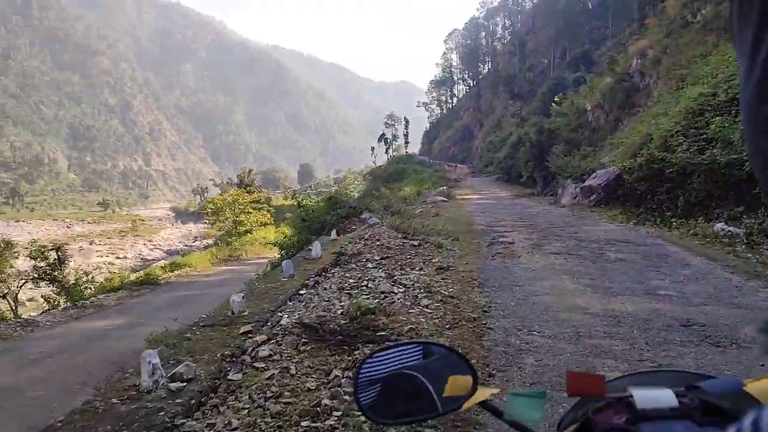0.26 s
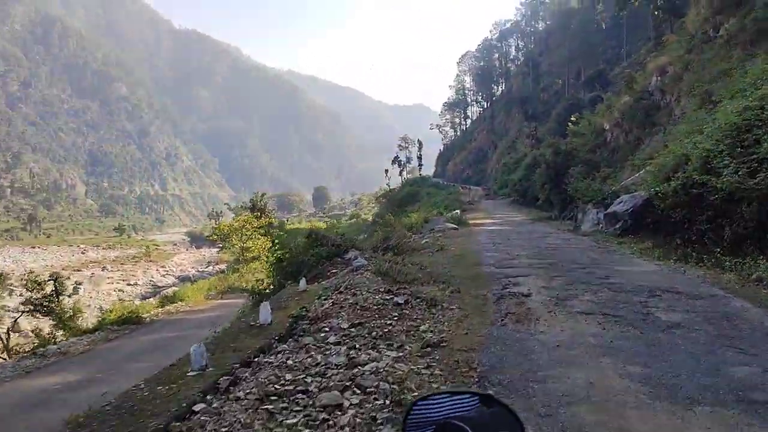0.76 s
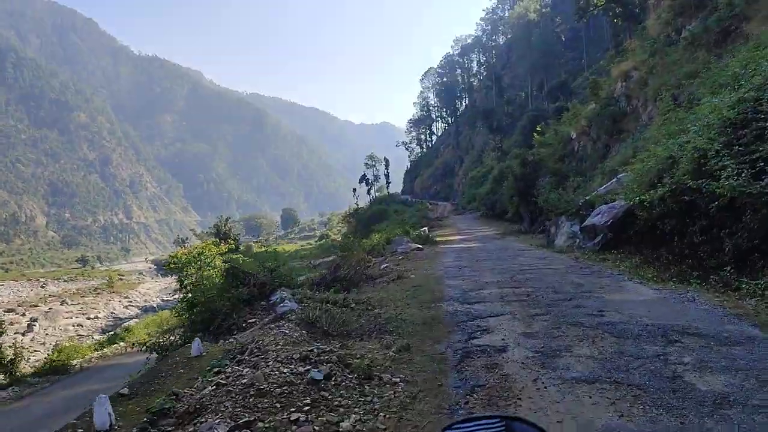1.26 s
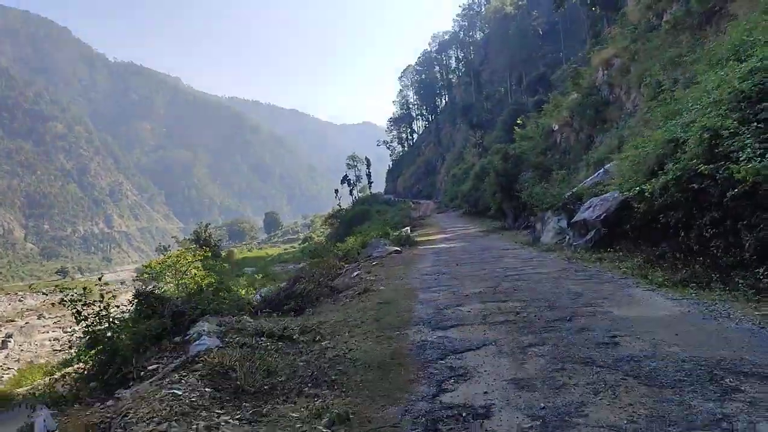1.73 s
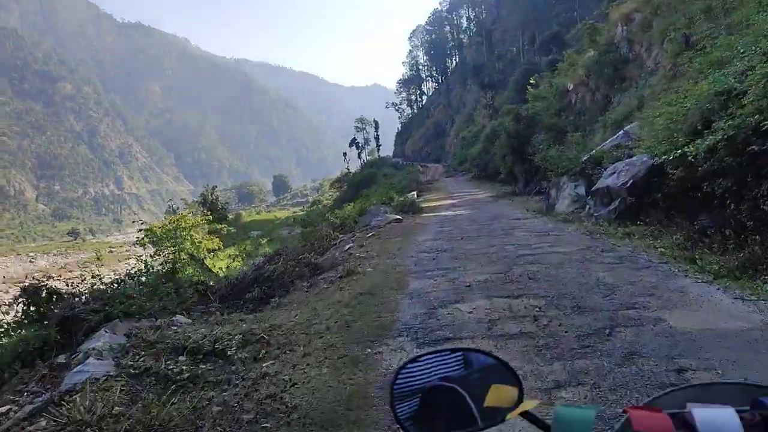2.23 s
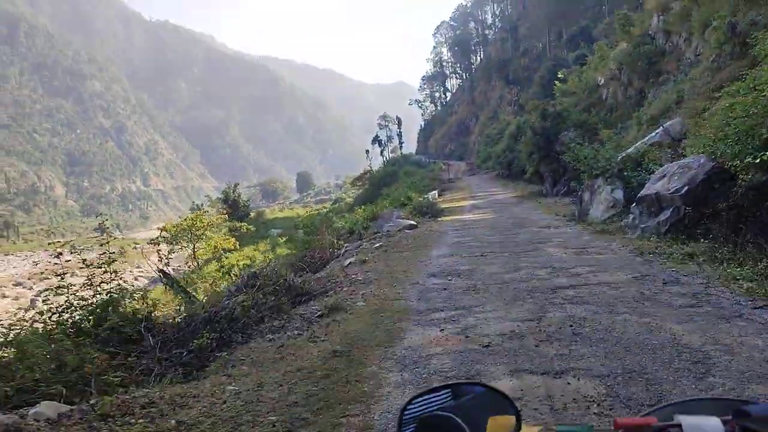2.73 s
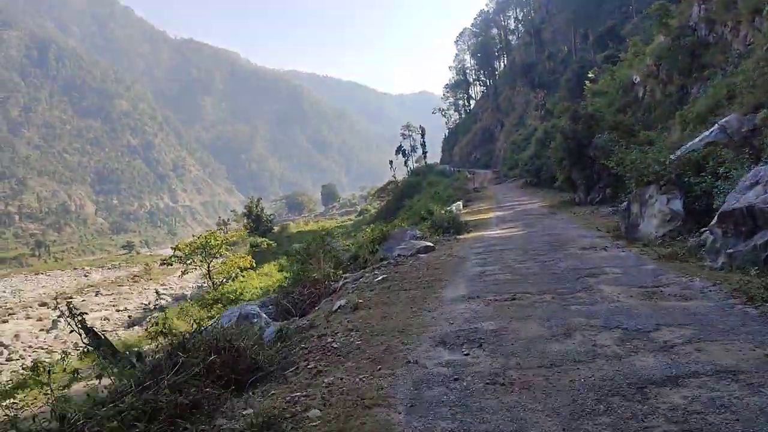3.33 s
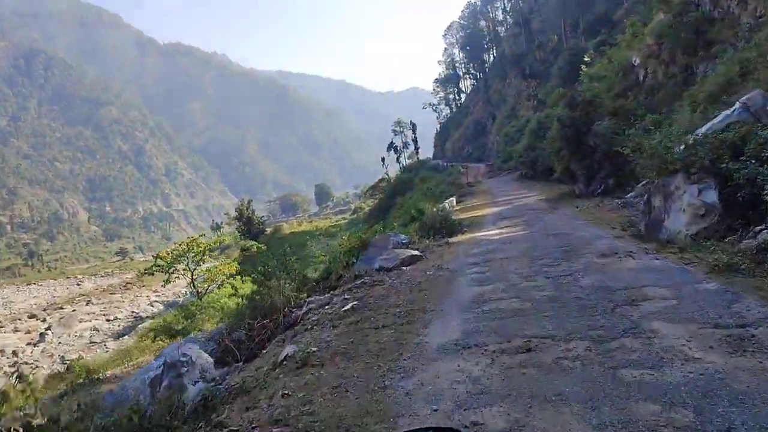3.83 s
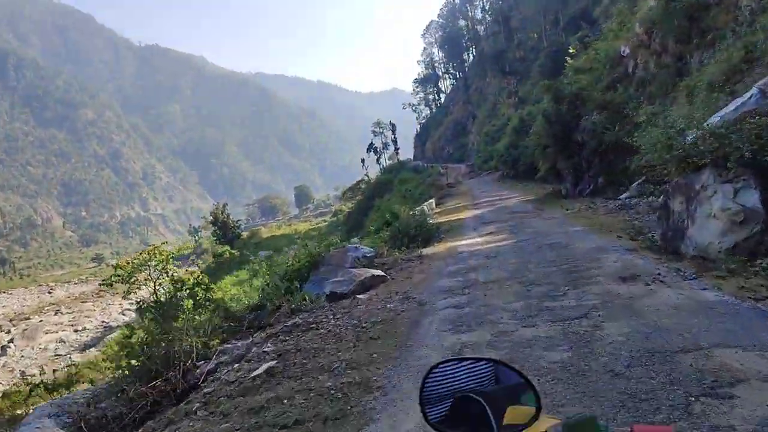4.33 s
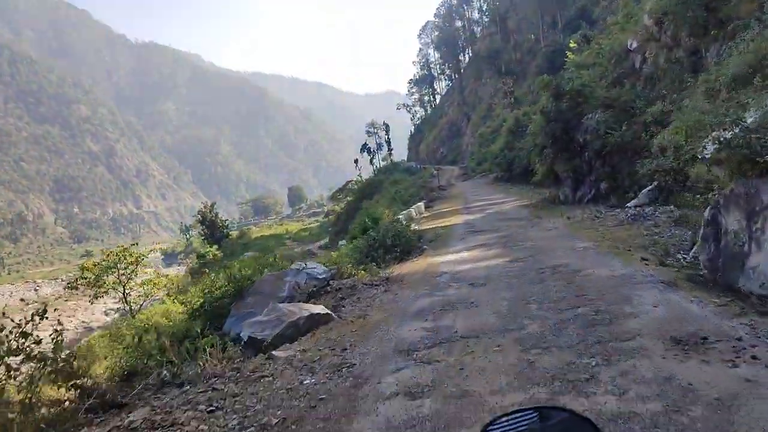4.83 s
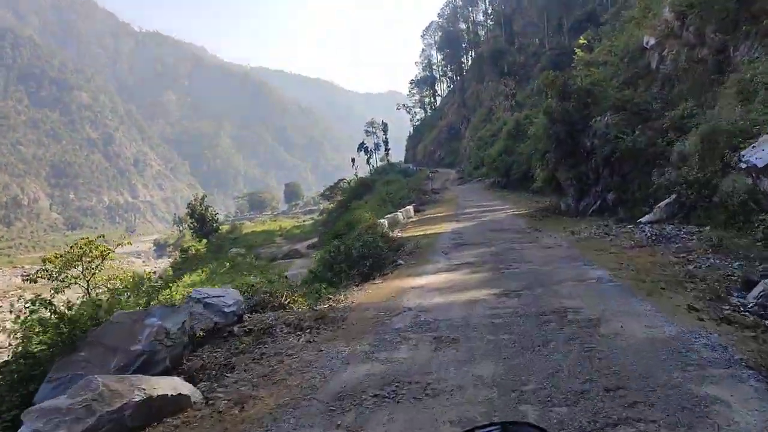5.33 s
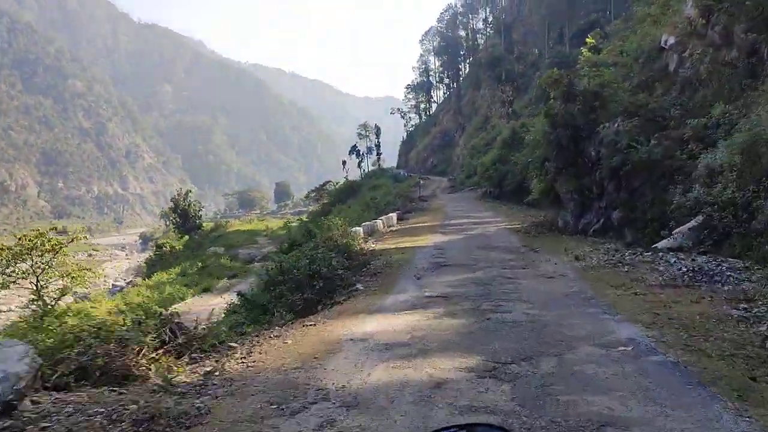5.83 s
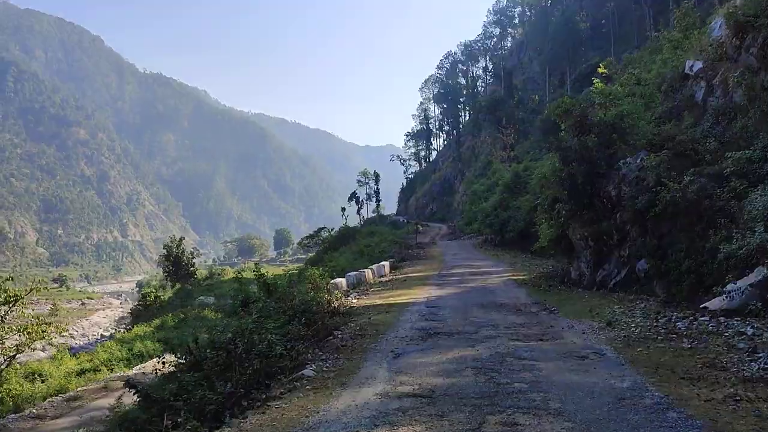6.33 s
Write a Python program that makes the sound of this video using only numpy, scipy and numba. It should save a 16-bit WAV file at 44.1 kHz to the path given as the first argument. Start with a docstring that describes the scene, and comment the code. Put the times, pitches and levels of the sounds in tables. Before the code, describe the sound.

From the saddle, a low thudding motorcycle engine dips, accelerates and dips again under heavy wind gusts, with faint chain whine and loose metal ticks.

```python
"""A single-cylinder motorcycle on a rough hill road, heard from the saddle through two microphone ports.
Timed firings drive its boom, exhaust and clatter; it sinks to idle, picks up, pulls and shuts off again.
Filtered noise makes the wind, with gusts and buffets at each port, brighter towards the end.
Gliding tones make the chain and gears sing; ringing noise makes loose metal tick and rattle over bumps.
A brief squeak is one wavering tone; shaped noise makes the hiss of tyres and air behind it all."""
import sys
import numpy as np
from scipy import signal
from scipy.fft import rfft, irfft, next_fast_len
from scipy.io import wavfile
from scipy.ndimage import uniform_filter1d
from numba import njit

SR = 44100
rng = np.random.default_rng(int(sys.argv[2]) if len(sys.argv) > 2 else 0)


def output_pcm(signal):
    """Save a mono or channel-first signal as 16-bit PCM at the path in sys.argv[1].

    Samples are clipped to [-1, 1] before scaling.
    """
    pcm = np.clip(np.atleast_2d(signal).T, -1, 1) * 32767
    wavfile.write(sys.argv[1], SR, np.round(pcm).astype(np.int16))


N = 290530   # length in samples

# engine speed and throttle: time_s, firings_per_s, throttle (0 shut - 1 open)
ENGINE = [(0.0, 36.6, 0.55), (.28, 35, 0.88), (0.66, 35.8, 0.6), (0.78, 30.8, 0.063), (1.15, 23, 0.074),
          (1.62, 16.9, 0.046), (1.82, 23.3, 0.35), (2.02, 31, 0.85), (2.3, 29.5, 0.65), (2.72, 27.5, 0.8),
          (3.0, 27.6, 0.98), (3.3, 27.6, 0.9), (3.6, 29.5, 0.94), (4.8, 34, 0.99), (5.66, 36.4, 0.58),
          (5.82, 34, .05), (6.15, 26, 0.057), (6.59, 15, 0.054)]
# steady engine orders; the crank turns twice a firing, so the even ones lead:
# multiple (of the firing rate), relative_level_db
ORDERS = [(1, -11), (2, 0), (3, -19), (4, -13.5), (5, -16), (6, -16), (8, -13), (9, -17), (12, -11.5),
          (13, -23), (14, -27), (24, -30), (25, -26), (26, -30), (33, -31), (44, -28), (45, -31)]
# exhaust pipe and silencer resonances: pitch_hz, width_hz, relative_level_db
PIPE = [(72.3, 27, 6.5), (212, 106, -2.5), (290, 77, -2), (412, 33.5, 3.5), (896, 36, -14)]
# crankcase and fin resonances: pitch_hz, width_hz, relative_level_db
CASE = [(800, 174, -1.5), (1177, 146, 0.5), (1534, 95, 1), (2197, 92, -4.5), (3284, 110, -6.5),
        (3960, 67, -5.5)]
# firing and valve knocks in one four-stroke cycle: place (in the cycle, 0-1), relative_level_db
KNOCKS = [(0.05, 1), (0.309, 4), (0.559, 6.5), (0.798, 10.5)]
# whirr of chain and gears: pitch_hz, relative_level_db (per Hz)
WHIRR = [(150, 0), (450, -1), (650, 2.5), (1000, -2), (1500, -3), (1900, -12), (2800, -15), (3800, -22),
         (5200, -22), (8000, -41), (14000, -60)]
# loudness of boom, exhaust and clatter, before side levels and the clatter's own mix:
# level_db (cruising, full throttle), rise_db (per doubling of speed), loss_db (throttle shut)
BOOM_LAW = (-23.8, 17, 14.3)
EXHAUST_LAW = (-27, 0.78, 9)
CLATTER_LAW = (-49.5, 4.1, 4.6)
CRUISE_PER_S = 30   # firings per second
# spread of the firings' strength (dB); turbulent gas against the pulse (0-1)
FIRING_SCATTER_DB, PUFF_SHARE = 1.0, .1

# spells in which the drive chain and gears sing:
# start_s, length_s, start_pitch_hz, end_pitch_hz, level_db (before waver and side level)
WHINE = [(0, 0.78, 856, 879, -50), (2.051, 0.36, 777.4, 769.3, -42.5), (2.407, .21, 795, 831, -45),
         (3.838, 0.3, 699, 713, -44), (5.201, 0.94, 862.4, 904, -41.5)]
WHINE_FADE_S = 0.053

# steady airflow between gusts: time_s, left_db, right_db (before trim), corner_hz (of the eddy spectrum)
AIRFLOW = [(0, -36, -36, 312), (.62, -21, -38.5, 306), (1.28, -26, -44, 426), (1.7, -25, -56, 227),
           (2.45, -28, -45, 350.4), (3.2, -22.5, -32.5, 370), (4.4, -20, -37, 370), (4.95, -22, -34, 680),
           (5.75, -18, -29.5, 740), (6.15, -23, -28, 800), (6.59, -20.5, -38, 800)]
RIGHT_CORNER_SHARE = 0.57   # the steady flow is duller at the right port
# gusts: start_s, length_s, level_db (before trim), corner_hz (of the eddy spectrum), port (0 left, 1 right)
GUSTS = [(0.292, 0.085, -14, 267, 0), (0.487, 0.035, -14, 310, 0), (0.651, 0.046, -7, 298, 0),
         (0.967, 0.13, -17, 415, 0), (0.986, 0.22, -31, 242, 1), (1.39, 0.14, -28, 284.3, 0),
         (1.505, 0.047, -16, 200, 0), (1.58, .15, -17, 162.2, 0), (1.777, 0.08, -15, 197, 0),
         (1.904, 0.087, -21, 231, 0), (2.06, 0.032, -19.5, 247, 0), (2.255, 0.069, -25.5, 304, 0),
         (2.476, 0.13, -30.5, 328, 0), (2.712, 0.078, -14, 279.5, 0), (2.779, 0.13, -21, 424, 0),
         (2.958, 0.063, -16, 390.4, 0), (3.121, 0.078, -30, 325.2, 1), (3.196, 0.06, -16.5, 274.7, 0),
         (3.308, 0.072, -14.5, 376, 0), (3.484, 0.14, -17, 432.6, 0), (3.7, 0.087, -21.5, 330, 1),
         (3.84, 0.16, -17.5, 401, 0), (4.109, 0.11, -15.5, 429.7, 0), (4.18, 0.32, -26, 352.1, 1),
         (4.295, 0.11, -12.5, 305, 0), (4.43, 0.25, -27, 400, 1), (4.48, 0.049, -7, 220, 0),
         (4.591, 0.053, -19, 280, 0), (4.68, 0.059, -12.5, 380.7, 0), (4.798, 0.077, -10, 665, 0),
         (4.924, 0.068, -31, 400, 1), (4.998, 0.07, -11.5, 305.8, 1), (5.099, 0.041, -15.5, 450.6, 1),
         (5.127, 0.022, -16, 498, 0), (5.213, 0.092, -17.5, 230.2, 1), (5.316, 0.2, -16.5, 481, 0),
         (5.366, 0.066, -27, 319, 1), (5.52, 0.039, -22, 290, 1), (5.566, 0.077, -8.5, 445, 0),
         (5.667, 0.028, -15.5, 319, 1), (5.709, 0.12, -14, 543, 0), (5.752, 0.04, -20.5, 260, 1),
         (5.917, 0.048, -17, 720, 0), (5.997, 0.064, -13, 480, 1), (6.066, 0.072, -18, 527, 1),
         (6.193, 0.13, -15.5, 800, 1), (6.322, 0.065, -24.5, 857, 1), (6.406, 0.087, -17, 649, 1),
         (6.529, 0.048, -8.5, 514, 1)]
GUST_ATTACK_S, GUST_RELEASE_S = .02, .03
# shelter at a port, mostly brief lulls: start_s, length_s, change_db, port (0 left, 1 right)
LULLS = [(0.588, 0.06, -17, 0), (1.183, 0.063, -7.5, 0), (2.171, 0.062, -6, 0), (2.35, .12, -3.5, 0),
         (2.92, 0.044, -2.5, 0), (3.635, 0.12, -9.5, 0), (3.782, 0.049, -6, 0), (4.422, 0.059, -8, 0),
         (4.892, .06, -3.5, 0), (5.805, .08, -9, 1), (0.81, .06, 1, 0), (0.936, 0.035, -5, 0),
         (6.472, 0.062, -13, 1)]
LULL_FADE_S = .015
# lumpiness grows with the flow: level_db, share (of full lumpiness, 0-1)
LUMPINESS = [(-26, .5), (-18, 1)]
# eddy shedding: place of its hump and of the skirt above (times the corner); the hump's sharpness (Q)
HUMP_RATIO, SKIRT_RATIO, HUMP_SHARPNESS = .68, 2.7, .8
# single hard buffets: time_s, level_db, corner_hz (of the eddy spectrum), port (0 left, 1 right)
BUFFETS = [(0.308, -14, 300, 0), (0.346, -12, 270, 0), (0.506, -12.5, 380, 0), (0.559, -9.5, 438, 0),
           (0.666, -4.5, 470, 0), (0.693, -4.5, 370, 0), (0.773, -19, 580, 0), (0.793, -7, 430, 0),
           (0.883, -13, 520, 0), (1.043, -12.5, 580, 0), (1.063, -15, 480, 0), (1.521, -11.5, 270, 0),
           (1.617, -7.5, 260, 0), (1.659, -6, 200, 0), (1.707, -5, 180, 0), (1.804, -8.5, 240, 0),
           (2.746, -6.5, 320, 0), (3.326, -9, 435, 0), (3.407, -15.5, 480, 0), (3.576, -12, 630, 0),
           (3.604, -8, 370, 0), (3.72, -10, 600, 1), (3.753, -12, 351, 1), (3.859, -14, 560, 0),
           (4.064, -10.5, 560, 0), (4.119, -11, 600, 0), (4.38, -8.5, 332.7, 0), (4.475, -14.5, 600, 1),
           (4.497, -6, 260, 0), (4.761, -12.5, 720, 0), (4.815, -10.5, 800, 0), (4.859, -11, 482.7, 0),
           (4.886, -13.5, 760, 0), (5.011, -9.5, 477, 1), (5.137, -9, 480, 1), (5.225, -8, 260, 1),
           (5.278, -10, 640, 0), (5.431, -9.5, 690, 0), (5.575, -5, 400, 0), (5.66, -13.5, 705, 0),
           (5.729, -9, 790, 0), (5.756, -10.5, 660, 0), (5.799, -13, 765, 0), (6.098, -8, 720, 0),
           (6.192, -11.5, 780, 1), (6.218, -10.5, 920, 1), (6.305, -16.5, 950, 1), (6.409, -10.5, 760, 1),
           (6.451, -16.5, 760, 1), (6.542, -7, 620, 1)]
# time from push to suction and spread of the blow (periods of the corner); spectrum edge (times the corner)
SWING_TURNS, EDDY_TURNS, BUFFET_EDGE = .8, 2.2, 1.12
# time over which a buffet's level counts (s); its flurry's spread (s) and strength against the pulse (dB)
BUFFET_S, FLURRY_S, FLURRY_DB = .008, .003, -2
# gusts that crack at the right port: time_s, rasp_start_db (before the tone filters)
CRACKS = [(6.194, -28), (6.2195, -12.5), (6.242, -29), (6.248, -27), (6.281, -26), (6.296, -25),
          (6.305, -26), (6.3105, -24), (6.338, -26), (6.359, -31), (6.377, -31), (6.411, -27), (6.44, -29),
          (6.451, -29), (6.5497, -11)]
# a crack's rasp dies quickly (s); its spike stands above it (dB)
CRACK_DECAY_S, SPIKE_DB = .002, 23.5
# the largest eddies, felt as a deep flapping: time_s, level_db (right port then set lower)
FLAP = [(0, -27), (.5, -16), (1.3, -31.5), (2.6, -23.5), (3.66, -18.5), (3.78, -7.5), (3.93, -16),
        (4.55, -13.5), (4.9, -21.5), (5.25, -18.5), (5.9, -18.5), (6.55, -22)]

# loose metal ticking over bumps: time_s, start_db (before ringing and the final level)
TICKS = [(0.4125, -38), (1.6182, -45), (3.2595, -36), (3.4894, -40), (3.5894, -45), (3.689, -34),
         (3.914, -41), (4.2098, -40), (5.4044, -35), (5.6004, -34)]
# resonances of the loose metal: pitch_hz, width_hz, relative_level_db
METAL = [(3820, 130, 4), (5800, 280, -2), (6980, 200, 4), (8040, 680, -1.5), (10100, 900, -12),
         (12600, 900, -12)]
# short rattles on the crankcase: start_s, length_s, level_db
RATTLES = [(2.28, 0.026, -31), (2.43, 0.035, -40), (2.857, 0.069, -45), (3.055, 0.099, -40.5)]
# a brief squeak of the chassis: start_s, length_s, pitch_hz, peak_db
SQUEAK = (.21, .075, 2320, -44)

# hiss of tyres and rushing air: time_s, left_db, right_db (before trim)
HISS = [(0, -50.5, -52.5), (.75, -52.5, -52), (1.55, -58.5, -63.5), (2.35, -51.5, -53), (5.0, -51.5, -50),
        (6.03, -50, -50.5), (6.13, -51, -71), (6.55, -52.5, -69)]
# colour of the hiss: pitch_hz, relative_level_db (per Hz)
HISS_COLOUR = [(1500, 8), (3500, 3.5), (5600, -5), (7000, -1.5), (8300, -3), (9600, -11), (12000, -10.5),
               (14000, -12)]
# brief swishes in the hiss: start_s, length_s, level_db (before trim)
SWISHES = [(0.26, 0.24, -46.5), (5.292, 0.12, -45.5)]
SWISH_ATTACK_S, SWISH_RELEASE_S = 0.15, 0.23

CUTOFF_HZ = 14300   # top of the finished sound


def engine(left_db=-6.5):
    """Engine speed times every pulse; speed and throttle set the loudness; the silencer lies on the right."""
    per_s, throttle = in_time(ENGINE)
    cycles = np.cumsum(per_s * (1 + .002 * drift(10))) / SR
    doublings = np.log2(per_s / CRUISE_PER_S)
    shut = 1 - np.clip(throttle, 0, 1)
    boom_gain, pipe_gain, clatter_gain = [from_db(db + rise_db * doublings - loss_db * shut)
                                          for db, rise_db, loss_db in (BOOM_LAW, EXHAUST_LAW, CLATTER_LAW)]
    bass = boom_gain * boom(cycles)
    pipe = pipe_gain * exhaust(cycles, per_s) * from_db([[left_db], [0]])
    return bass + pipe + clatter_gain * clatter(cycles, per_s)


def boom(cycles, waver_db=2.0):
    """The engine's steady orders are pure tones, each wavering a little in strength."""
    orders = sum(from_db(db + waver_db * drift(10.0)) * np.cos(2 * np.pi * round(multiple) * cycles)
                 for multiple, db in ORDERS)
    return -rms_one(orders)


def exhaust(cycles, per_s, puff_s=0.0038, intake_db=-11, intake_place=0.5):
    """Each firing sends a pulse and a puff of gas down the pipe; the intake gulps half a cycle later."""
    firings = strokes(cycles, 0, FIRING_SCATTER_DB)
    gulps = from_db(intake_db) * strokes(cycles, intake_place, FIRING_SCATTER_DB)
    pulses = (firings + gulps) / np.sqrt(per_s)
    puffs = rng.standard_normal(N) * np.exp(-(cycles % 1) / per_s / puff_s)
    gas = -rms_one(pulses) + PUFF_SHARE * rms_one(puffs)
    return rms_one(cut(resonate(gas, PIPE), 1080, "low"))


def clatter(cycles, per_s, knock_db=5, whirr_db=11.0, throb_db=1.0, knock_s=0.0062):
    """Piston and valves knock on the case; chain and gears whirr in step with the crank."""
    blows = sum(from_db(db) * np.exp(-((cycles - place) % 1) / per_s / knock_s) for place, db in KNOCKS)
    clicks = sum(from_db(db) * strokes(cycles, place, scatter_db=3.0) for place, db in KNOCKS)
    scrape = rms_one(blows * rng.standard_normal((2, N)))
    contact = .3 * scrape + rms_one(clicks)
    knocks = rms_one(cut(resonate(contact, CASE), 2600, "low"))
    # the crank turns twice a cycle
    whirr = coloured_noise(WHIRR) * from_db(throb_db * np.cos(4 * np.pi * cycles))
    return from_db(knock_db) * knocks + from_db(whirr_db) * whirr


def whine(upper_ratio=1.54, upper_db=0, right_db=-3, waver_db=3.5):
    """Two meshes of the drive sing in spells: a clear gliding tone and a rougher one above it."""
    t = np.arange(N) / SR
    out = 0
    for start, length, start_hz, end_hz, db in WHINE:
        glide_hz = np.interp(t, [start, start + length], [start_hz, end_hz])
        hz = glide_hz * (1 + .009 * drift(14))
        clear = np.sqrt(2) * np.sin(2 * np.pi * np.cumsum(hz) / SR)
        rough = from_db(upper_db) * narrow_tone(hz * upper_ratio, width_hz=250)
        out = out + from_db(db) * swell(start, length, WHINE_FADE_S, WHINE_FADE_S) * (clear + rough)
    return out * from_db(waver_db * drift(36.0)) * from_db([[0], [right_db]])


def wind(port, trim_db, lumpy_db, eddy_rate, port_hz, low_hz):
    """Turbulent pressure at one port, with a hump where eddies are shed and a steep fall above it."""
    level_db, corner_hz = flow(port)
    lumps = np.clip(drift(eddy_rate), -2, 1.9)
    # weak flow is smooth, strong flow lumpy, at about equal power
    spread_db = lumpy_db * np.interp(level_db, *np.transpose(LUMPINESS))
    power_fix_db = spread_db ** 2 * np.log(10) / 20
    eddies = rng.standard_normal(N) * from_db(spread_db * lumps - power_fix_db)
    thumps, blowing = buffets(port)
    # the flow slackens around a big eddy
    slack_db = -5.5 * np.minimum(uniform_filter1d(blowing, SR // 25) / .2, 1)
    # large slow eddies carry more pressure
    heavy_db = 4 * (330 / np.maximum(corner_hz, 140) - 1)
    pressure = from_db(level_db + trim_db + slack_db + heavy_db) * eddies
    # a stronger eddy is also faster, so brighter
    corner_hz = np.clip(corner_hz * np.exp(0.021 * (lumps - 1)), 50, 3000)
    turn = 2 * np.pi * corner_hz / SR
    # make up for the power that the moving filter takes away
    passed_share = HUMP_SHARPNESS * HUMP_RATIO * turn / 2
    rumble = moving_lowpass(pressure / np.sqrt(passed_share), HUMP_RATIO * turn,
                            HUMP_SHARPNESS, np.exp(-SKIRT_RATIO * turn))
    return cut(cut(rumble, port_hz, "low") + thumps, low_hz, "high", order=1)


def flow(port):
    """Gusts add power to the steady air and pull its corner; shelter shifts the level: (dB, corner Hz)."""
    *steady_db, steady_hz = in_time(AIRFLOW)
    power = from_db(steady_db[port]) ** 2
    weighted_hz = power * steady_hz * (RIGHT_CORNER_SHARE if port else 1)
    for start, length, db, hz, side in GUSTS:
        if round(side) == port:
            gust = (from_db(db) * swell(start, length, GUST_ATTACK_S, GUST_RELEASE_S)) ** 2
            power = power + gust
            weighted_hz = weighted_hz + gust * hz
    shelter_db = sum(db * swell(start, length, LULL_FADE_S, LULL_FADE_S)
                     for start, length, db, side in LULLS if round(side) == port)
    return 10 * np.log10(power) + shelter_db, weighted_hz / power


def buffets(port):
    """A big eddy hits: a push, then suction, in a brief flurry with a steep top; also gives when it blows."""
    half = SR // 30
    t = np.arange(-half, half) / SR
    thumps, blowing = np.zeros((2, N + SR))
    for s, db, hz, side in BUFFETS:
        if round(side) == port:
            near = slice(int(s * SR) - half, int(s * SR) + half)
            pulse = np.zeros(2 * half)
            pulse[[half - int(SWING_TURNS / hz * SR), half]] = .5, -1
            flurry = rng.standard_normal(2 * half) * np.exp(-.5 * (t / FLURRY_S - .5) ** 2)
            pulse, flurry = [rms_one(cut(part, BUFFET_EDGE * hz, "low", order=4))
                             for part in (pulse, flurry)]
            gain = from_db(db) * np.sqrt(BUFFET_S * SR / len(t))
            thumps[near] += gain * rms_one(pulse + from_db(FLURRY_DB) * flurry)
            blowing[near] += np.exp(-.5 * (t * hz / EDDY_TURNS) ** 2)
    return thumps[:N], np.minimum(blowing[:N], 1)


def cracks(left_db=-22):
    """Gusts snap, mainly at the right port: each is one sharp spike and a short rasp of noise."""
    spikes = np.zeros(N)
    for s, db in CRACKS:
        spikes[int(s * SR)] = from_db(db + SPIKE_DB)
    rasps = jolts(CRACKS, decay_s=CRACK_DECAY_S) * rng.standard_normal(N)
    snaps = cut(spikes + rasps, 1500, "low", order=1)
    snaps = cut(snaps, 4200, "low", order=5)
    return cut(snaps, 600, "high") * from_db([[left_db], [0]])


def flapping(top_hz=55, right_db=-3):
    """Eddies larger than the microphone heave on each port as deep noise."""
    heave = rms_one(cut(rng.standard_normal((2, N)), top_hz, "low"))
    return from_db(in_time(FLAP)[0]) * heave * from_db([[0], [right_db]])


def ticks(level_db=5, right_db=-6):
    """A loose metal part chatters at each bump: dying bursts of noise make it ring."""
    chatter = jolts(TICKS, decay_s=0.018) * rng.standard_normal((2, N))
    return resonate(chatter, METAL) * from_db(level_db) * from_db([[0], [right_db]])


def rattles(per_s=260, fade_s=0.019):
    """On the bumps something loose buzzes against the crankcase in many random touches."""
    shaking = sum(from_db(db) * swell(start, length, fade_s, fade_s) for start, length, db in RATTLES)
    touches = (rng.random(N) < per_s / SR) * rng.standard_normal((2, N))
    return shaking * rms_one(cut(resonate(touches, CASE[1:3]), 2000, "low"))


def squeak(fade_s=0.059):
    """Metal rubs on metal for a moment and sings one slightly unsteady note."""
    start, length, hz, db = SQUEAK
    turn = 2 * np.pi * np.cumsum(hz * (1 + .006 * drift(30))) / SR
    return from_db(db) * swell(start, length, fade_s, fade_s) * np.sin(turn)


def hiss(trim_db=6.5, flutter_db=1.5):
    """Tyres and rushing air give a thin, slightly fluttering hiss that swishes up now and then."""
    swish_power = sum((from_db(db) * swell(start, length, SWISH_ATTACK_S, SWISH_RELEASE_S)) ** 2
                      for start, length, db in SWISHES)
    level = np.sqrt(from_db(in_time(HISS)) ** 2 + swish_power)
    return level * from_db(trim_db + flutter_db * drift(15.0)) * coloured_noise(HISS_COLOUR)


def from_db(db):
    """Decibels to gain."""
    return 10 ** (np.asarray(db) / 20)


def rms_one(x):
    """Scale to unit power."""
    return x / np.sqrt(np.mean(x ** 2) + 1e-20)


def in_time(rows):
    """The columns of a curve at every sample."""
    s, *columns = np.transpose(rows)
    return [np.interp(np.arange(N) / SR, s, column) for column in columns]


def drift(rate):
    """Smooth chance of spread 1; a higher rate makes it change faster."""
    # made at one twentieth of the sample rate; the start-up is thrown away
    r = np.exp(-40 * np.pi * rate / SR)
    slow = signal.lfilter([1], [1, -2 * r, r * r], rng.standard_normal(N // 20 + 3002))[3000:]
    return np.interp(np.arange(N) / 20, np.arange(len(slow)), rms_one(slow))


def swell(start, length, attack_s, release_s):
    """Rise, hold and fall between 0 and 1; the ramps are centred on the start and the end."""
    t = np.arange(N) / SR - start
    return np.clip(np.minimum(t / attack_s, (length - t) / release_s) + .5, 0, 1)


def jolts(events, decay_s):
    """Sudden starts that die away."""
    starts = np.zeros(N)
    for s, db in events:
        starts[int(s * SR)] = from_db(db)
    return signal.lfilter([1], [1, -np.exp(-1 / (decay_s * SR))], starts + 1e-18)


def strokes(cycles, place, scatter_db):
    """One click a cycle at the given place, each of its own strength."""
    at = np.flatnonzero(np.diff(np.floor(cycles - place)) > 0)
    clicks = np.zeros(N)
    clicks[at] = from_db(scatter_db * rng.standard_normal(size=400)[:len(at)])
    return clicks


def narrow_tone(hz, width_hz):
    """A tone whose strength and phase wander, so that it fills a narrow band; rms about 1."""
    turn = 2 * np.pi * np.cumsum(hz * np.ones(N)) / SR
    return drift(width_hz) * np.cos(turn) + drift(width_hz) * np.sin(turn)


def coloured_noise(spectrum):
    """Unrelated noise for each side with the given spectrum; rms 1 over both."""
    hz, db = np.transpose(spectrum)
    size = next_fast_len(N)
    bins = np.maximum(np.fft.rfftfreq(size, 1 / SR), 1)
    gain = from_db(np.interp(np.log(bins), np.log(hz), db))
    return rms_one(irfft(rfft(rng.standard_normal((2, size))) * gain, size)[:, :N])


def cut(x, hz, kind, order=2):
    """Butterworth low- or high-pass."""
    return signal.sosfilt(signal.butter(order, min(hz, .45 * SR), kind, fs=SR, output="sos"), x)


def resonate(x, modes):
    """Parallel resonances with alternating signs; a wider one dies away sooner."""
    out = 0
    for k, (hz, width, db) in enumerate(modes):
        r = np.exp(-np.pi * width / SR)
        poles = [1, -2 * r * np.cos(2 * np.pi * hz / SR), r * r]
        ringing = (1 - r * r) / 2 * signal.lfilter([1, 0, -1], poles, x + 1e-18)
        out = out + (-1) ** k * from_db(db) * ringing
    return out


@njit
def moving_lowpass(x, step, sharpness, pole):
    """A resonant low-pass whose hump moves, then a moving one-pole low-pass."""
    out = np.zeros(len(x))
    low = band = smooth = 0.
    for i in range(len(x)):
        low += step[i] * band
        band += step[i] * (x[i] - low - band / sharpness)
        smooth += (1 - pole[i]) * (low - smooth)
        out[i] = smooth
    return out


def scene():
    """The machine reaches both ports; each port has its own wind."""
    machine = engine() + whine() + ticks() + rattles() + squeak()
    left = wind(port=0, trim_db=6.5, lumpy_db=4.5, eddy_rate=65, port_hz=1480.1, low_hz=37.6)
    right = wind(port=1, trim_db=8.5, lumpy_db=4.5, eddy_rate=89, port_hz=2430, low_hz=24.6)
    air = np.array([left, right]) + cracks() + flapping()
    return machine + air + hiss()


def record(dry):
    """Subsonic sway is removed, peaks are rounded, the top is cut."""
    rounded = np.tanh(cut(dry, 16.0, "high"))
    return signal.sosfilt(signal.ellip(10, .2, 80, CUTOFF_HZ, fs=SR, output="sos"), rounded)


dry = scene()
out = record(dry)
output_pcm(out)
```